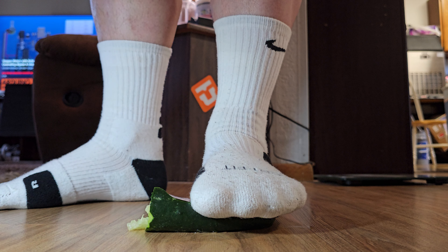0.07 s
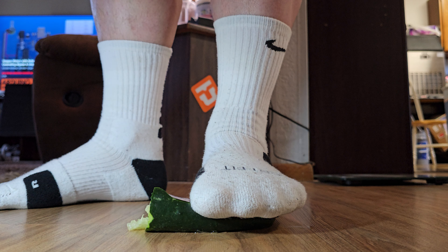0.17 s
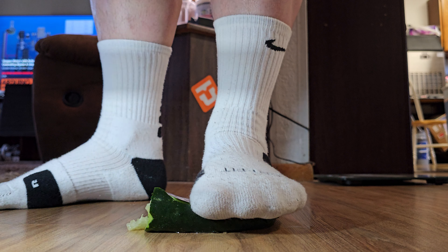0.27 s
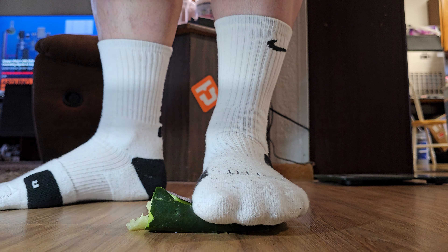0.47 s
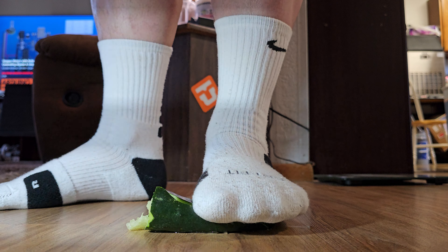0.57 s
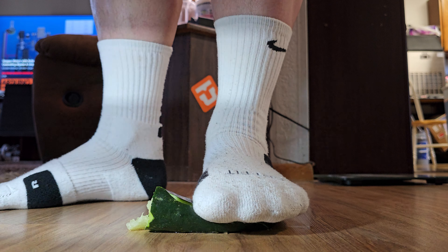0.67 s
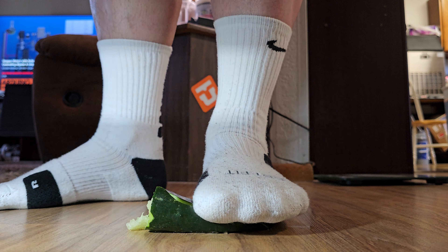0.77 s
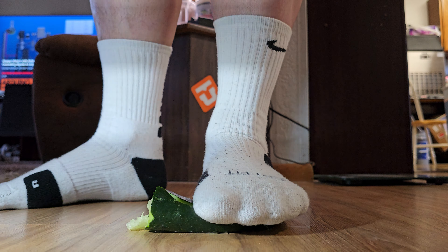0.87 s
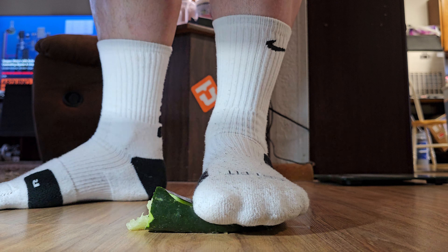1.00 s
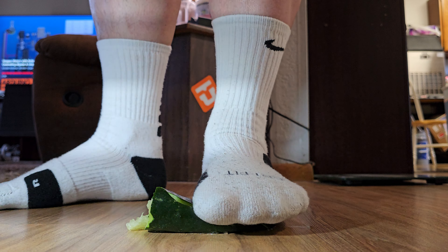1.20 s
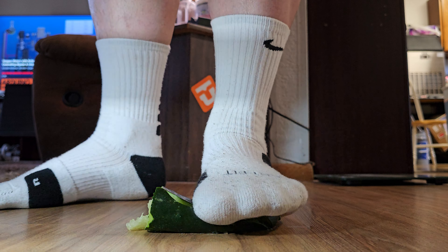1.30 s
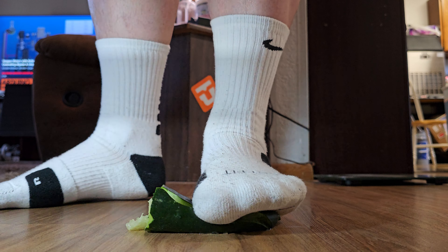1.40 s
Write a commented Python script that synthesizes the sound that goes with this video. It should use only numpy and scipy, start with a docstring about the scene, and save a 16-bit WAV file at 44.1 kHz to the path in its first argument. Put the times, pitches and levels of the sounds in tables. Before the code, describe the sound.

Crisp, wet cracks of a cucumber being stepped on, then one smaller late crack.

```python
"""Cucumber cracking underfoot

A foot in a sock presses a cucumber against a wooden floor, close to the microphone in a small room.
The skin fractures in a run of sharp cracks that excite damped modes of rind and flesh and trail a
crackle of bursting cells. Juice then squeaks faintly through the splits, and small wet ticks lead to
one more crack. The room reverberates, over a steady fan and mains hum."""
import sys
import numpy as np
from scipy import signal
from scipy.fft import rfft, irfft
from scipy.io import wavfile
from scipy.ndimage import uniform_filter1d, minimum_filter1d

SR = 44100
rng = np.random.default_rng(int(sys.argv[2]) if len(sys.argv) > 2 else 0)


def int16_out(signal):
    """Quantize to a 16-bit WAV file."""
    q = np.round(np.clip(np.atleast_2d(signal).T, -1, 1) * 32767)
    wavfile.write(sys.argv[1], SR, q.astype(np.int16))


N = 63945
SKIN_LAG_S = .00008  # the right channel hears the skin this much later
# spectrum of a snap of the skin or of a cell: f/Hz, relative level/dB
SNAP_SPECTRUM = [(200, 5.5), (750, -2), (1300, 10), (2200, 4), (3100, 6), (4400, 2), (6200, -5.5),
                 (8000, -11), (11000, -16.5), (16000, -23)]


def cracks():
    """Impulse excitation: each fracture snaps the skin, then the flesh thumps and the rind knocks."""
    # fractures: t/s, thump level/dB, thump f/Hz, overtone lift/(dB/octave), knock level/dB, knock f/Hz,
    # snap level/dB, snap tilt/(dB/octave), treble edge f/Hz, tear decay time/s, snap pan L-R/dB
    splits = [(0.1748, -38.5, 255, 11, -63, 1410, -48, 3.5, 9000, .001, 5),
              (0.2208, -17, 224, 20, -29, 1410, -33.5, -6, 9000, 0.0012, -8),
              (0.2238, -22, 231, 8.5, -26.5, 1300, -39.5, 9.5, 14000, 0.002, 5),
              (0.2326, -19, 235, -5, -29, 1400, -31.5, 3.5, 14000, 0.0027, -1),
              (0.2476, -34, 220, 9.5, -32.5, 1840, -37.5, -3, 14000, 0.0011, -5.5),
              (0.2526, -12, 204, -3.5, -32, 2020, -35.5, 6, 14000, 0.0036, 1),
              (0.259, -44, 193, 6.5, -55.5, 1400, -41, 0.5, 14000, .001, -1),
              (0.2985, -5.5, 227.5, 0, -17, 1125, -16.5, 6, 6340, 0.00029, -2),
              (.302, -22, 226, 0.5, -28, 1350, -22, 1, 12000, 0.005, -3.5),
              (0.3152, -23.5, 210, -4, -53, 1400, -26.5, 2.5, 16000, 0.00074, 1.5),
              (0.421, -27.5, 228, -0.5, -34, 1430, -38, 5, 12000, 0.00087, 3),
              (.469, -11.5, 234.6, 1, -21.5, 1257, -17.5, -0.5, 5010, 0.0011, 3),
              (0.4711, -36.5, 220, 9.5, -32.5, 2040, -30.5, 1.5, 5460, 0.0051, -14),
              (1.4297, -33, 244.6, 11, -44.5, 1220, -30.5, 1, 3400, 0.00034, 2),
              (1.433, -32, 227, -3, -40.5, 1210, -30.5, 5.5, 6800, 0.0033, 1.5)]
    # modes of the flesh on the floor: ratio to thump frequency, relative level/dB, T60/s
    flesh_modes = [(.72, -3.5, 0.054), (1.02, 5, 0.018), (1.95, -1.5, 0.02), (2.45, -32.5, 0.0096)]
    # modes of the rind: ratio to knock frequency, relative level/dB, T60/s
    rind_modes = [(.76, 12.5, .006), (1, 28.5, 0.0042), (1.04, -2.5, 0.023), (1.4, 12.5, 0.01),
                  (1.8, 2, .004)]
    out = np.zeros((2, N))
    for (t, thump_db, thump_hz, lift_db, knock_db, knock_hz,
         snap_db, tilt_db, edge_hz, tear_s, pan_db) in splits:
        flesh = ring([(thump_hz * k, db + lift_db * np.log2(k), t60) for k, db, t60 in flesh_modes])
        rind = ring([(knock_hz * k, db, t60) for k, db, t60 in rind_modes])
        skin = snap(SNAP_SPECTRUM, tilt_db, edge_hz, tear_s, scatter_db=15.5)
        add(out, unit(highpass(flesh, hz=142)), t + 0.00057, thump_db, pan_db=1, lag_s=0.00028)
        add(out, unit(highpass(rind, hz=636)), t + 0.00069, knock_db, pan_db=1.5, lag_s=SKIN_LAG_S)
        add(out, skin, t, snap_db, pan_db, SKIN_LAG_S)
    return out


def snap(points, tilt_db, edge_hz, tear_s, scatter_db, size=2048):
    """Brittle fracture: an impulse and a ragged tear scatter_db above it, low-passed by wet flesh."""
    apart, evenness = 0.71, 0.35  # share of tear power unlike in L and R; flattening of spectral ripple
    noise = rng.standard_normal((3, size))
    ragged = np.sqrt(1 - apart) * noise[2] + np.sqrt(apart) * noise[:2]
    tear = ragged * np.exp(-np.arange(size) / SR / tear_s)
    force = unit(tear) * np.sqrt(2) * undb(scatter_db)
    force[:, 0] += 1  # the clean break
    spectrum = rfft(force)
    muffle = 1 / np.sqrt(1 + (np.fft.rfftfreq(size, 1 / SR) / edge_hz) ** 4)
    spectrum = spectrum * causal(muffle / np.abs(spectrum) ** evenness)
    return unit(irfft(spectrum * rfft(colour(points, tilt_db)))) * np.sqrt(2)


def crackle(cells_per_s=4200, spread_db=2.5):
    """Shot noise: cells burst independently, each a tiny click of random size."""
    # envelope of the crackle: t/s, level/dB
    envelope = [(0, -81), (.14, -67.5), (0.207, -57.5), (0.221, -30), (0.28, -46.5), (0.329, -38),
                (.40, -52), (.46, -45.5), (.50, -36.5), (0.571, -59), (0.749, -73), (.95, -76), (1.07, -67),
                (1.13, -63.5), (1.29, -60.5), (1.401, -58), (1.45, -45.5)]
    at, level_db = np.array(envelope).T
    bursts = rng.random(N) < cells_per_s / SR
    sizes = undb(spread_db * np.minimum(rng.exponential(size=N), 4))
    clicks = unit(bursts * sizes * rng.standard_normal((2, N))) * np.sqrt(2 * N)
    clicks = clicks * undb(np.interp(np.arange(N) / SR, at, level_db))
    return signal.fftconvolve(clicks, colour(SNAP_SPECTRUM)[None], axes=1)[:, :N]


def ticks_and_creaks():
    """Local stress release: fibres and wet pockets tick; the skin creaks as it first takes the weight."""
    # wet ticks and dry creaks: t/s, level/dB, tilt/(dB/octave), treble edge f/Hz, tear decay time/s
    ticks = [(.275, -41.5, 1.5, 12200, .001), (0.328, -48, -1, 12000, 0.0012),
             (0.375, -45, -1.5, 12000, 0.0013), (0.384, -41, 6.5, 13430, 0.0013),
             (0.4274, -43, 6, 12000, 0.0017), (.4478, -41.5, 4, 7000, .002),
             (0.4497, -54.5, -7, 6900, .001), (0.481, -31, -1.5, 6120, 0.00082),
             (0.4917, -38.5, 2, 11800, 0.00086), (0.5588, -43, -3.5, 15800, 0.00053),
             (0.6764, -46, -1.5, 6000, 0.0023), (0.7266, -54.5, -1.5, 7000, 0.0015),
             (0.9963, -46.5, 3, 8800, 0.00081), (1.1118, -47, 0.5, 5500, 0.0045),
             (1.1280, -49, -4, 6500, 0.0017), (1.1403, -35.5, 2, 9000, 0.00073),
             (1.1769, -49, 10, 8000, 0.0006), (1.209, -62, 12.5, 8000, 0.00097),
             (1.2230, -55, 5.5, 7000, 0.0016), (1.2296, -59.5, 22, 12000, 0.0032),
             (1.2354, -47, 1.5, 4500, 0.00095), (1.2644, -56.5, 8, 6040, 0.0014),
             (1.3294, -73, 8, 6950, 0.00062), (1.333, -50, 3, 5500, 0.0027), (1.366, -43, 1, 3760, 0.00057),
             (1.411, -61, 6, 4300, .001), (1.4144, -60, 3, 5300, 0.0011)]
    creaks = [(.1500, -35, 0.5, 14040, .0014), (.1585, -37, -1, 8910, .002), (.1772, -41, 0, 9500, .0008)]
    # their spectra: f/Hz, relative level/dB
    tick_spectrum = [(200, 3.5), (550, 18), (850, -1), (1400, 0.5), (1800, 3.5), (2200, 4.5), (3100, 10),
                     (3700, 2), (4500, 1.5), (7500, -1), (10000, -23.5), (13000, -19), (16000, -37.5)]
    creak_spectrum = [(200, 0.5), (550, 7), (850, -11.5), (1400, 1), (2300, -3.5), (3100, 7.5), (4200, 6.5),
                      (5200, -15), (6200, -1.5), (7000, -12), (9500, -12.5), (16000, -27)]
    out = np.zeros((2, N))
    for events, spectrum in ((ticks, tick_spectrum), (creaks, creak_spectrum)):
        for t, db, tilt_db, edge_hz, tear_s in events:
            click = snap(spectrum, tilt_db, edge_hz, tear_s, scatter_db=5.5)
            add(out, click, t, db, pan_db=0, lag_s=SKIN_LAG_S)
    return out


def juice_squeaks(flicker_db=4, flicker_per_s=70, smoothing=70):
    """Flow-excited tones: juice forced through narrow splits whistles, wavering and stuttering."""
    # upper, lower and brief frayed whistle: t/s, f/Hz, relative level/dB, wobble as a fraction of f
    upper = [(.57, 10900, -93, .004), (.615, 11970, -80, .008), (.655, 11700, -86.5, .003),
             (.685, 11230, -76, .002), (.73, 11530, -83, .003), (.755, 11550, -92.5, .002),
             (.785, 11300, -77.5, .002), (.81, 11600, -91.5, 0.0025), (.845, 12100, -85.5, 0.0036),
             (.88, 11450, -78, .006), (.90, 10800, -87.5, .002), (.955, 10950, -85.5, .0018),
             (.985, 10500, -95.5, .003)]
    lower = [(.76, 8260, -89, .005), (.78, 8400, -85.5, 0.0038), (.81, 8400, -96.5, 0.01),
             (.86, 8300, -91.5, .008), (.885, 7840, -84, 0.0046), (.915, 8000, -82.5, 0.0043),
             (.955, 8050, -80.5, .004), (.995, 7300, -81.5, 0.0068)]
    frayed = [(.80, 12000, -92, .01), (.835, 12900, -80, .02), (.86, 12700, -86.5, .02),
              (.885, 11700, -92.5, .01)]
    t = np.arange(N) / SR
    out = np.zeros(N)
    for whistle in (upper, lower, frayed):
        at, hz, db, depth = np.array(whistle).T
        drift = uniform_filter1d(rng.standard_normal(N), smoothing) * np.sqrt(smoothing)
        pitch_hz = np.interp(t, at, hz) * (1 + drift * np.interp(t, at, depth))
        phase = 2 * np.pi * np.cumsum(pitch_hz) / SR
        gate = uniform_filter1d(1. * ((t > at[0]) & (t < at[-1])), smoothing)
        stutter_db = flicker_db * np.interp(t * flicker_per_s, np.arange(N), rng.standard_normal(N))
        out += np.sqrt(2) * np.sin(phase) * undb(np.interp(t, at, db) + stutter_db + 0.5) * gate
    return out


def reverberation(x, early_db=-10.5, early_s=0.0048, tail_db=-2, onset_s=0.014, bands=12):
    """Reflection and absorption: early echoes off feet and furniture, then a tail dying band by band."""
    # spectrum of the tail: f/Hz, relative level/dB
    tail_spectrum = [(60, -20), (95, -18), (150, -0.5), (260, -13.5), (500, -8.5), (800, -9.5),
                     (1500, -16.5), (3000, -20), (6000, -11), (15000, -11.5)]
    # reverberation time: f/Hz, T60/s
    decay_times = [(100, 0.34), (260, 0.26), (700, 0.29), (1800, 0.67), (4800, 0.47), (15000, 0.084)]
    t, hz = np.arange(N) / SR, np.fft.rfftfreq(N, 1 / SR)
    tail = diffuse() * undb(along(tail_spectrum, hz) + tail_db)
    early_fade = unit(np.exp(-t / early_s) * (1 - np.exp(-2 * t / early_s)))
    response = irfft(diffuse(), N) * early_fade * undb(early_db)
    build_up = 1 - np.exp(-(t / onset_s) ** 2)
    edges = np.geomspace(50, SR / 2, bands + 1)
    for lo, hi in zip(edges, edges[1:]):
        fade = np.exp(-np.log(1000) * t / along(decay_times, np.sqrt(lo * hi)))
        response += irfft(tail * (hz >= lo) * (hz < hi), N) * unit(fade * build_up)
    return signal.fftconvolve(x, response, axes=1)[:, :N]


def standing_waves(x, gain_db=-36, delay_s=0.01345):
    """Resonance: the low modes of the room ring on after each thump."""
    # room modes: f/Hz, relative level/dB, T60/s
    modes = [(153.1, 8.5, 0.43), (197, 1.5, .15), (212.9, 11.5, 0.26), (287, 6.5, 0.27), (390, -14, 0.6),
             (497, 2, 0.11)]
    response = np.pad(ring(modes, size=16384), (int(delay_s * SR), 0))
    return signal.fftconvolve(x.mean(axis=0), response)[:N] * undb(gain_db)


def fan_and_hum(fan_db=-46.5, hum_db=-49.5, hum_hz=120.3, hum_pan_db=7):
    """Stationary background: diffuse broadband fan rumble and a pure tone of mains hum to the left."""
    # fan rumble: f/Hz, relative spectral density level/dB
    fan_spectrum = [(25, -30.5), (55, -4), (90, -3), (150, -4), (190, -13.5), (235, -5), (275, -2.5),
                    (350, -13), (435, -2), (490, -13.5), (540, -0.5), (610, -9), (680, -2.5), (800, -16),
                    (950, -16), (1100, -18), (1500, -24.5), (2300, -35.5), (3100, -35.5), (5000, -48.5),
                    (9000, -62.5), (15000, -64)]
    air = irfft(diffuse() * undb(along(fan_spectrum, np.fft.rfftfreq(N, 1 / SR))), N)
    fan = unit(air) * np.sqrt(2 * N) * undb(fan_db)
    hum = np.sqrt(2) * np.sin(2 * np.pi * hum_hz * np.arange(N) / SR)
    return fan + hum * undb(hum_db + np.array([[1], [-1]]) * hum_pan_db / 2)


def diffuse():
    """Diffuse field: a stereo noise spectrum, coherent in the bass and top treble, hardly so between."""
    # coherence of left and right: f/Hz, correlation
    coherence = [(60, 0.45), (200, 0.92), (500, .55), (1000, 0), (3000, 0.14), (15000, 1)]
    correlation = np.clip(along(coherence, np.fft.rfftfreq(N, 1 / SR)), -.99, .99)
    mid, side = rfft(rng.standard_normal((2, N)))
    mid, side = mid * np.sqrt((1 + correlation) / 2), side * np.sqrt((1 - correlation) / 2)
    return np.array([mid + side, mid - side])


def ring(modes, size=4096):
    """Modal superposition: damped sinusoids (f/Hz, level/dB, T60/s) after one blow, at unit energy."""
    t = np.arange(size) / SR
    return unit(sum(undb(db) * np.sin(2 * np.pi * hz * t) * np.exp(-np.log(1000) * t / t60)
                    for hz, db, t60 in modes))


def colour(points, tilt_db=0, size=2048):
    """Impulse response of unit energy with the given spectrum, tilted per octave above 1 kHz."""
    hz = np.fft.rfftfreq(size, 1 / SR)
    level_db = along(points, hz) + tilt_db * np.log2(np.maximum(hz, 1000))
    return unit(irfft(causal(undb(level_db))))


def causal(gain):
    """Minimum phase: folding the cepstrum gives the spectrum of the most compact causal click."""
    cepstrum = irfft(np.log(gain + 1e-9))
    half = cepstrum.shape[-1] // 2
    cepstrum[..., 1:half] *= 2
    cepstrum[..., half + 1:] = 0
    return np.exp(rfft(cepstrum))


def add(out, x, start, db, pan_db, lag_s):
    """Level and time differences place a unit-energy sound in stereo; db refers its energy to 5 ms."""
    x = np.broadcast_to(x, (2, x.shape[-1])) * undb(db) * np.sqrt(.005 * SR)
    for ch, side in enumerate((1, -1)):
        i = max(0, int(round(start * SR)) + ch * int(round(lag_s * SR)))
        part = x[ch, :max(0, N - i)]
        out[ch, i:i + len(part)] += part * undb(side * pan_db / 2)


def highpass(x, hz):
    """Radiation loss: a small body radiates little bass, here a second-order cut."""
    return signal.sosfilt(signal.butter(2, hz, "high", fs=SR, output="sos"), x)


def along(points, hz):
    """Interpolate (f/Hz, value) points on a log-frequency axis."""
    p = np.array(points, float)
    return np.interp(np.log(np.maximum(hz, 1)), np.log(p[:, 0]), p[:, 1])


def undb(db):
    """Decibels to amplitude ratio."""
    return 10 ** (np.asarray(db) / 20)


def unit(x):
    """Scale to unit energy."""
    return x / np.sqrt(np.sum(x ** 2))


def scene():
    """Superposition: the cucumber's direct sound, the room's response and the background add."""
    crunch = highpass(cracks() + crackle() + juice_squeaks(), hz=173)
    small_snaps = ticks_and_creaks()
    echo = reverberation(crunch + undb(1) * small_snaps)
    return crunch + small_snaps + echo + standing_waves(crunch) + fan_and_hum()


def record(dry, limiter_samples=45, top_hz=15800):
    """Filtering and limiting: the channels differ in colour, peaks are held and the top is cut."""
    # channel balance: f/Hz, level L-R/dB
    balance = [(60, -4.5), (130, -3), (250, -1), (520, 1), (1100, 0), (2200, 0.5), (4200, 0), (8000, -2.5),
               (15000, 1)]
    balance_db = np.array([[1], [-1]]) * along(balance, np.fft.rfftfreq(N, 1 / SR)) / 2
    heard = irfft(rfft(dry) * undb(balance_db), N)
    gain = 1 / np.maximum(1, np.abs(heard).max(axis=0))  # ceiling at full scale
    heard = heard * uniform_filter1d(minimum_filter1d(gain, limiter_samples), limiter_samples)
    return signal.sosfilt(signal.ellip(10, .2, 80, top_hz, fs=SR, output="sos"), heard)


dry = scene()
out = record(dry)
int16_out(out)
```